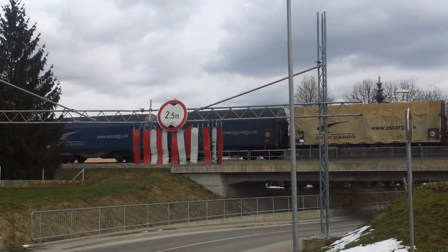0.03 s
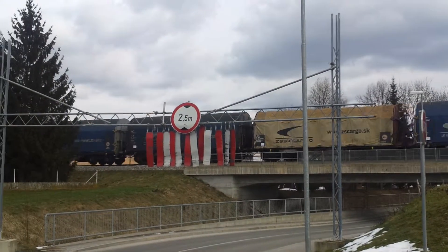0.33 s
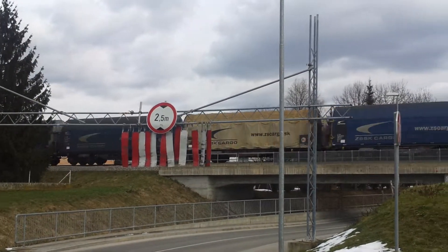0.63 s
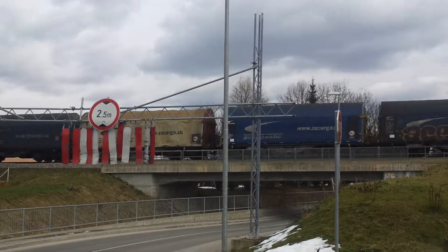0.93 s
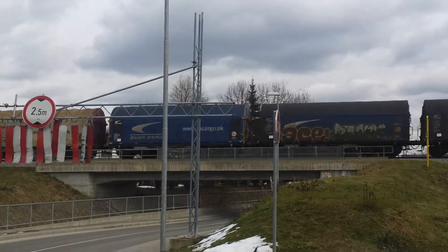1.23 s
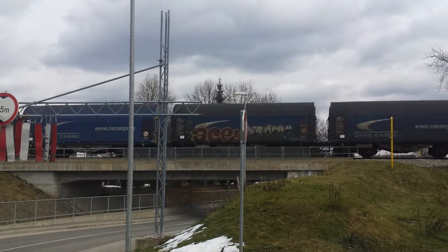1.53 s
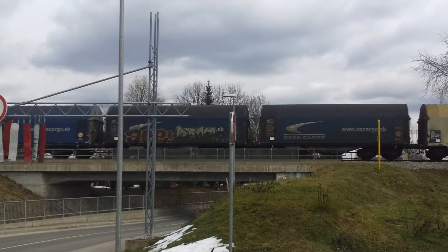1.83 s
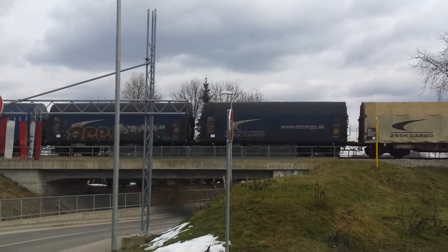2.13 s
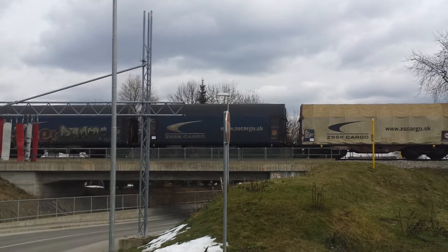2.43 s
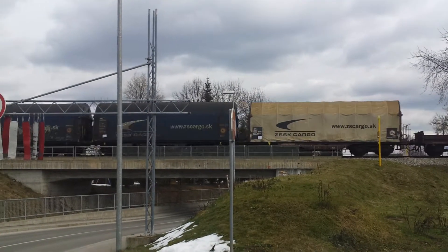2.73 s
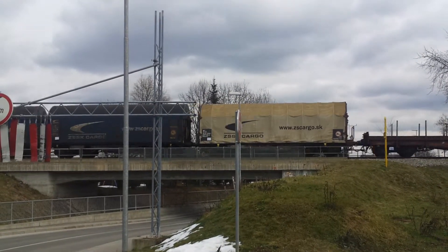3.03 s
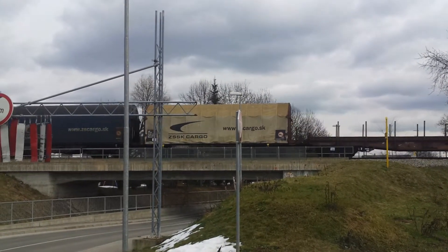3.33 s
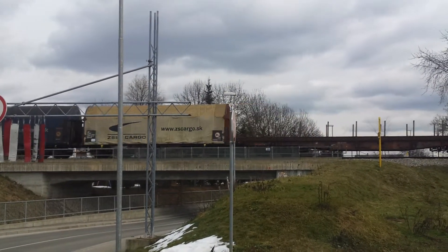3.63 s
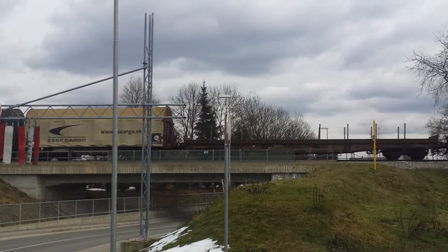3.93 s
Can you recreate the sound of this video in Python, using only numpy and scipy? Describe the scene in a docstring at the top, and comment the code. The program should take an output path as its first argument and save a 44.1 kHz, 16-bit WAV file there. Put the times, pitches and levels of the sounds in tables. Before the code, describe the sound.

A freight train rolls across a concrete bridge with a steady roar and deep rumble. Wheels thud and clank now and then, with light rattling, hissing and faint squeaks, heard from the roadside some way off.

```python
"""A steady roar and a deep rumble: a freight train rolls over a concrete road bridge, some way off.
Rough wheels make the rails roar and the deck rumble. Wheels ring faintly and squeak, slipping steel
hisses, loose fittings rattle, and now and then a wheel thuds or pings or the running gear clanks.
Two microphones at the roadside pick it up; their signals are most alike in the bass."""
import sys
import numpy as np
from scipy import signal
from scipy.fft import rfft, irfft
from scipy.io import wavfile

SR = 44100
rng = np.random.default_rng(int(sys.argv[2]) if len(sys.argv) > 2 else 0)


def unload_wav(signal):
    """Save mono or channel-first audio to the path in sys.argv[1] as 16-bit WAV at rate SR, clipped to [-1, 1]."""
    wavfile.write(
        sys.argv[1],
        SR,
        np.round(np.clip(np.atleast_2d(signal).T, -1, 1) * 32767).astype(np.int16),
    )


N = 176400  # 4 seconds

# Levels and gains in the tables are relative: the functions scale them further.
# tone of the wheels' roar on the rails: pitch_hz, left_gain_db, right_gain_db
ROAR_TONE = [(99, -30, -45.5), (232, -2.5, -4), (443, -4, -4.5), (680, -2, -2.5), (720, -0.5, -0.5),
             (1100, -3, -2.5), (1255, 1.5, 0.5), (1400, -5.5, -2), (2180, -6.5, -2.5), (2200, -13.5, -2.5),
             (2750, -12.5, -6.5), (3080, -18, -10), (3620, -15, -11), (3990, -19, -18.5),
             (4400, -20.5, -11), (4760, -20.5, -19), (5280, -20.5, -15.5), (5960, -23.5, -24),
             (7300, -25.5, -31), (9000, -29, -32.5)]
# loudness of the roar as the wheels pass: time_s, level_db
ROAR_LEVEL = [(0, -20), (.16, -18), (.25, -19), (.43, -18.5), (.6, -16.5), (.88, -16.5), (1.1, -18),
              (1.2, -19), (1.55, -18), (1.99, -17.5), (2.69, -20.5), (2.8, -18), (3.47, -17), (3.6, -18),
              (3.83, -17), (4, -17)]
# loudness of the rail's singing note: time_s, level_db
RAIL_NOTE_LEVEL = [(0, -39), (.9, -32.5), (1.6, -36), (2, -33), (2.6, -34.5), (3.45, -28), (3.62, -44),
                   (3.8, -27), (4, -36)]
# tone of the rumbling bridge deck and wagons: pitch_hz, gain_db
RUMBLE_TONE = [(20, -59.5), (38, -52), (58, -38), (76, -19), (98, -19.5), (118, -13), (150, -11), (195, -7),
               (230, 0), (300, -3.5), (355, -3), (420, -9), (600, -22), (1500, -63)]
# loudness of the rumble: time_s, level_db
RUMBLE_LEVEL = [(0, -24.5), (.42, -24.5), (.67, -20), (.73, -29), (.85, -21), (1.2, -25.5), (2, -22),
                (2.2, -27.5), (2.65, -25), (3.35, -23), (4, -24)]
# loudness of the deck's hum: time_s, level_db
DECK_HUM_LEVEL = [(0, -30.5), (1.7, -29), (2.1, -33.5), (3.35, -33.5), (3.42, -22), (3.55, -30)]
# knocks of wheels and running gear: hit_s, hold_s, thud_db, clank_db
KNOCK_HITS = [(0.108, 0.018, -28, -24), (0.31, 0.014, -30, -25), (0.499, .005, -25, -20.5),
              (0.658, 0.014, -26, -38), (0.835, 0.028, -26, -23), (1.061, 0.011, -21, -17.5),
              (1.277, 0.0064, -21, -19), (1.485, 0.0052, -19, -23), (1.707, 0.015, -22, -27),
              (1.82, .004, -33, -29), (1.959, 0.024, -19, -19), (2.266, 0.012, -19, -23),
              (2.462, .008, -40, -15), (2.797, 0.0066, -17, -15.5), (3.003, .005, -27, -17.5),
              (3.391, 0.026, -18.5, -19.5), (3.456, 0.033, -21.5, -19.5), (3.793, 0.0052, -28, -18.5)]
# tone of a thud in the deck: pitch_hz, gain_db
THUD_TONE = [(50, -50), (150, -28), (240, 0.5), (290, -3), (355, 4), (430, -7.5), (1200, -38.5)]
# tone of clanking steel: pitch_hz, gain_db
CLANK_TONE = [(100, -41), (250, -13), (500, -6.5), (850, 4.5), (1500, -8), (2500, -13.5), (4000, -19.5),
              (9000, -35)]
# jolts of a bogie, the wheeled frame under a wagon: hit_s, hold_s, level_db
CLATTER_BURSTS = [(0.104, 0.12, -23.5), (1.03, 0.065, -26.5), (1.953, 0.066, -27), (3.39, 0.13, -27)]
# tone of the bogie's bright clatter: pitch_hz, gain_db
CLATTER_TONE = [(800, -33), (1600, 3), (2200, 3.5), (2800, -7.5), (3400, -7), (5200, -13.5), (9000, -29.5)]
# ringing wheels and rails: peak_s, spread_s, pitch_hz, width_hz, level_db, left_minus_right_db
WHEEL_NOTES = [(.52, 0.31, 1970, 18, -36.5, 1), (0.805, 0.11, 1064, 31, -28, -8),
               (1.5, 0.35, 2136, 23, -35, -3), (1.72, 0.28, 4390, 110, -40, -9),
               (1.303, 0.79, 5280, 160, -46, -6), (3.363, .25, 1930, 25, -36.5, -12),
               (3.45, 0.4, 2565, 18, -36, -12), (3.792, 0.021, 1264, 12, -25, 7)]
# pings of a struck wheel: hit_s, level_db
PING_HITS = [(.105, -33), (0.153, -29.5), (3.245, -24.5), (3.61, -32.5), (3.82, -29.5)]
# tone of slipping steel: pitch_hz, gain_db
SLIP_TONE = [(2000, -9.5), (4500, 5), (6500, -1), (9000, -5.5)]
# loudness of slipping steel: time_s, level_db
SLIP_LEVEL = [(0, -28.5), (.16, -33), (.42, -34.5), (.5, -32), (.72, -33), (1.2, -38), (1.8, -36),
              (2.15, -44), (2.27, -37), (2.4, -41), (2.75, -36), (3.35, -47), (3.46, -38), (4, -43.5)]
# squeaks of wheel rims: peak_s, spread_s, pitch_hz, level_db, left_minus_right_db
RIM_SQUEAKS = [(.52, .035, 6600, -48, 8), (1.78, .022, 7900, -45, 0), (3.043, 0.021, 7930, -40, 4),
               (3.23, .025, 8100, -46, 1), (3.457, .025, 7200, -41, 6), (3.607, .028, 7650, -42, 5)]
# how alike the two microphones are: pitch_hz, likeness_0_to_1
MIC_LIKENESS = [(25, 0.2), (80, 0.95), (330, 0.98), (480, 0.64), (780, 0.82), (1100, 0.23), (1600, 0.32),
                (2000, 0.27), (2800, 0.44), (4500, 0.03), (9000, 0)]
# how far the right microphone's wave is ahead of the left's: pitch_hz, phase_radians
RIGHT_MIC_LEAD = [(100, -.1), (600, 0), (1050, .6), (1400, 3.2), (2050, 3.6), (2300, 6.2), (3000, 6.5),
                  (3300, 8.4), (3900, 6.2)]


def rolling_roar():
    """Rough wheels shake the rails into a fluttering roar, and one rail note sings out."""
    tone = undb([over_pitch(ROAR_TONE, column=1), over_pitch(ROAR_TONE, column=2)])
    roar_db = over_time(ROAR_LEVEL) - 0.31 + 0.82 * wander(rate_hz=20)
    note = vibration(resonance(pitch_hz=930, width_hz=54)) * undb(over_time(RAIL_NOTE_LEVEL) + 3)
    return vibration(tone) * undb(roar_db) + note


def bridge_rumble():
    """The bridge deck and the wagons rumble as the axles roll, and one low note hums and throbs."""
    rumble = vibration(undb(over_pitch(RUMBLE_TONE)))
    rumble_db = over_time(RUMBLE_LEVEL) - 3.1 - 0.25 * wander(rate_hz=3.6)
    hum = vibration(resonance(pitch_hz=355, width_hz=25))
    hum_db = over_time(DECK_HUM_LEVEL) - 1 + wander(rate_hz=18)
    return (rumble * undb(rumble_db) + hum * undb(hum_db)) * pan(0.9)


def knocks():
    """Each blow thuds in the deck and clanks in the bogie; some judder on for a moment."""
    thuds, clanks = 0, 0
    for hit_s, hold_s, thud_db, clank_db in KNOCK_HITS:
        thuds += undb(thud_db) * blow(hit_s, hold_s, fade_s=0.022)
        clanks += undb(clank_db) * blow(hit_s, hold_s, fade_s=0.026)
    deck = vibration(undb(over_pitch(THUD_TONE)))
    steel = vibration(undb(over_pitch(CLANK_TONE)))
    return thuds * deck + clanks * steel


def bogie_clatter():
    """A jolted bogie shakes its steel parts in short, bright bursts."""
    bursts = sum(undb(level_db) * blow(hit_s, hold_s, fade_s=0.01, rise_s=0.01)
                 for hit_s, hold_s, level_db in CLATTER_BURSTS)
    return vibration(undb(over_pitch(CLATTER_TONE))) * bursts * pan(-5)


def ringing_wheels():
    """Single wheels and rails ring up and fade away as the wagons pass."""
    sound = 0
    for peak_s, spread_s, pitch_hz, width_hz, level_db, pan_db in WHEEL_NOTES:
        note = vibration(resonance(pitch_hz, width_hz))
        sound += note * swell(peak_s, spread_s) * undb(level_db) * pan(pan_db)
    return sound


def wheel_pings():
    """A struck wheel rings with one rough, slightly wavering note."""
    pitch_hz = 2530 + 6 * wander(rate_hz=30)
    phase = 2 * np.pi * np.cumsum(pitch_hz) / SR
    roughness = undb(3.5 * wander(rate_hz=120))
    strikes = sum(undb(level_db) * blow(hit_s, hold_s=0, fade_s=0.055) for hit_s, level_db in PING_HITS)
    return unit(np.sin(phase) * roughness) * strikes * pan(-8)


def steel_hiss():
    """Steel slips on steel with a flickering hiss."""
    level_db = over_time(SLIP_LEVEL) - 2 + 3.5 * wander(rate_hz=25)
    return vibration(undb(over_pitch(SLIP_TONE))) * undb(level_db) * pan(4.5)


def loose_fittings():
    """Loose fittings rattle in quick taps of random timing and strength."""
    taps_per_s, fade_s = 49, 0.0035
    taps = rng.random(N) < taps_per_s / SR
    strength_db = 3 * np.clip(rng.standard_normal(N), -2, 2)
    # give each tap a short, fading tail
    force = signal.lfilter([1], [1, -np.exp(-1 / (fade_s * SR))], taps * undb(strength_db))
    return vibration(undb(over_pitch(CLANK_TONE)), force) * undb(-37.5)


def rim_squeaks():
    """The lip on a wheel's rim grazes the rail with a faint, high squeak."""
    sound = 0
    for peak_s, spread_s, pitch_hz, level_db, pan_db in RIM_SQUEAKS:
        note = vibration(resonance(pitch_hz, width_hz=80))
        sound += note * swell(peak_s, spread_s) * undb(level_db) * pan(pan_db)
    return sound


def vibration(tone, force=1):
    """A random force shakes a body with this tone; gives what the left and right microphones hear."""
    left, unrelated = rfft(rng.standard_normal((2, N)) * force)
    likeness = over_pitch(MIC_LIKENESS)
    right = likeness * left + np.sqrt(1 - likeness ** 2) * unrelated
    right *= np.exp(1j * over_pitch(RIGHT_MIC_LEAD))
    return unit(irfft(np.array([left, right]) * tone, N))


def resonance(pitch_hz, width_hz):
    """The tone of a body that rings at one pitch; the gain halves width_hz to either side."""
    return 1 / (1 + ((frequencies() - pitch_hz) / width_hz) ** 2)


def blow(hit_s, hold_s, fade_s, rise_s=0.003):
    """Rise to full strength at hit_s, hold, then die away."""
    age_s = np.arange(N) / SR - hit_s
    return np.clip(1 + age_s / rise_s, 0, 1) * np.exp(-np.maximum(age_s - hold_s, 0) / fade_s)


def swell(peak_s, spread_s):
    """A bell-shaped rise and fall around peak_s."""
    return np.exp(-0.5 * ((np.arange(N) / SR - peak_s) / spread_s) ** 2)


def wander(rate_hz):
    """A smooth random wobble of typical size 1; a higher rate wobbles faster."""
    smoothing = np.exp(-(frequencies() / rate_hz) ** 2)
    return unit(irfft(rfft(rng.standard_normal(N)) * smoothing, N))


def over_time(rows):
    """Join (time_s, value) rows with straight lines."""
    return np.interp(np.arange(N) / SR, *np.array(rows).T)


def over_pitch(rows, column=1):
    """Join one column's values across pitch, giving every octave equal room."""
    rows = np.array(rows, float)
    return np.interp(np.log(frequencies()), np.log(rows[:, 0]), rows[:, column])


def frequencies():
    """The frequency in Hz of each point in a spectrum, never below 1."""
    return np.maximum(np.arange(N // 2 + 1) * SR / N, 1)


def pan(left_minus_right_db):
    """Left and right gains; a positive value moves the sound left."""
    return undb(np.array([[left_minus_right_db], [-left_minus_right_db]]) / 2)


def undb(db):
    """Turn decibels into a plain multiplier."""
    return 10 ** (np.asarray(db) / 20)


def unit(x):
    """Scale a signal to an average strength (rms) of 1."""
    return x / np.sqrt(np.mean(x ** 2))


def scene():
    """Add up all the sounds of the passing train."""
    main = rolling_roar() + bridge_rumble() + knocks() + bogie_clatter()
    return main + ringing_wheels() + wheel_pings() + steel_hiss() + loose_fittings() + rim_squeaks()


def record(dry):
    """The recorder steeply cuts the highest treble."""
    cutoff_hz = 9450
    return signal.sosfilt(signal.ellip(10, 0.2, 80, cutoff_hz, fs=SR, output="sos"), dry)


dry = scene()
out = record(dry)
unload_wav(out)
```